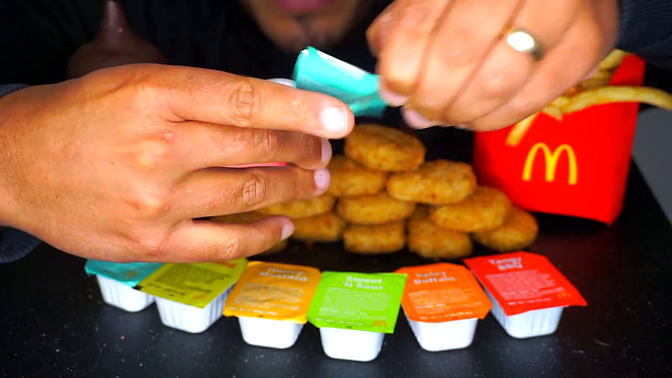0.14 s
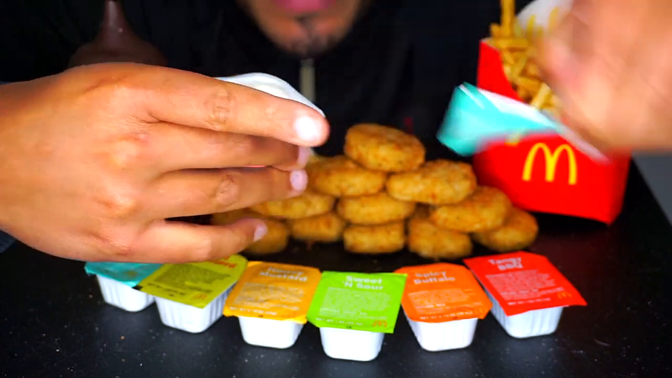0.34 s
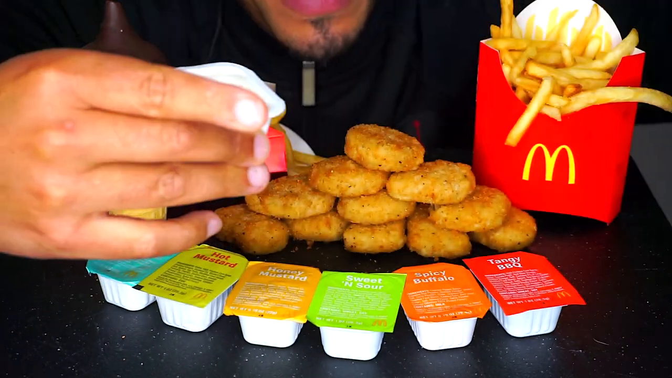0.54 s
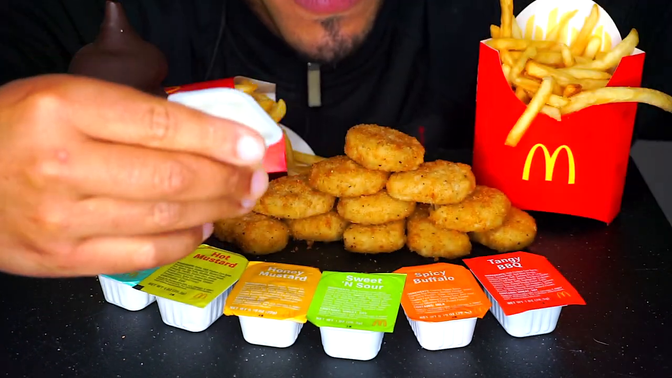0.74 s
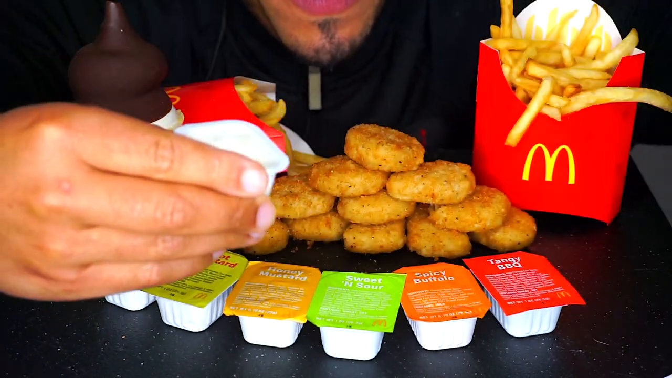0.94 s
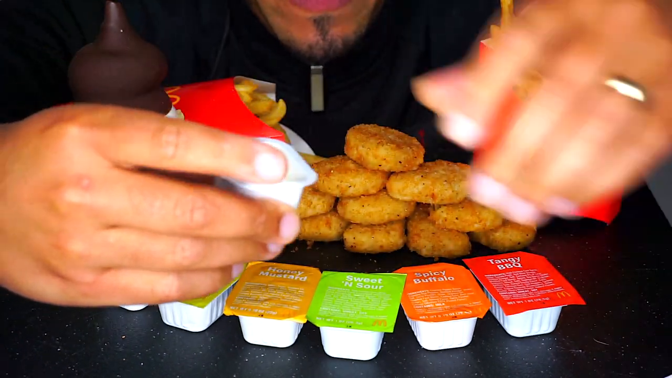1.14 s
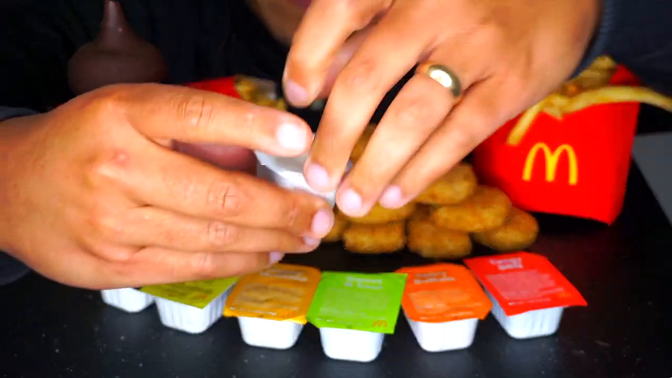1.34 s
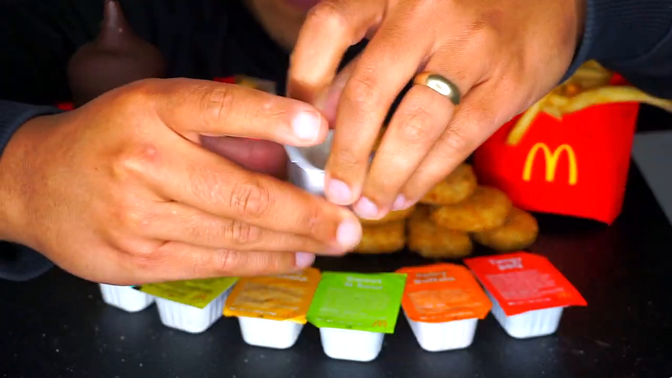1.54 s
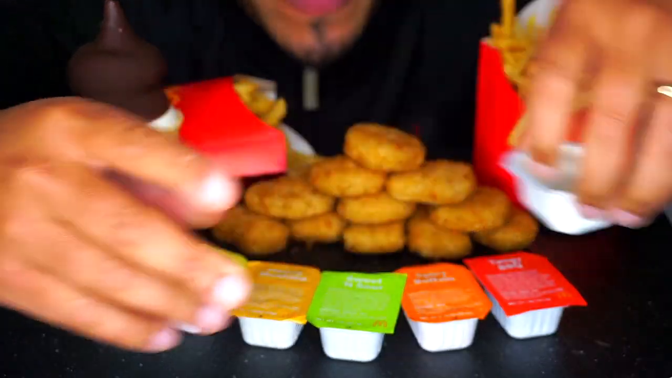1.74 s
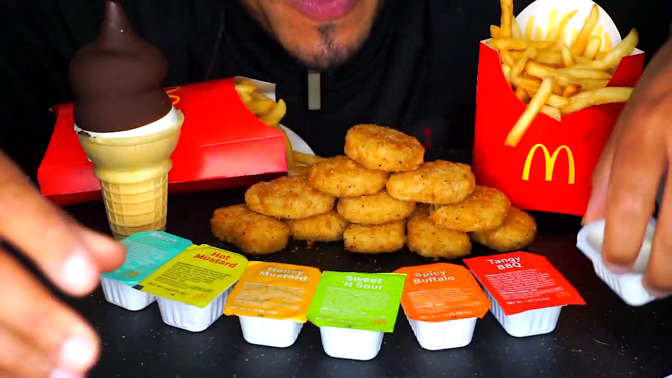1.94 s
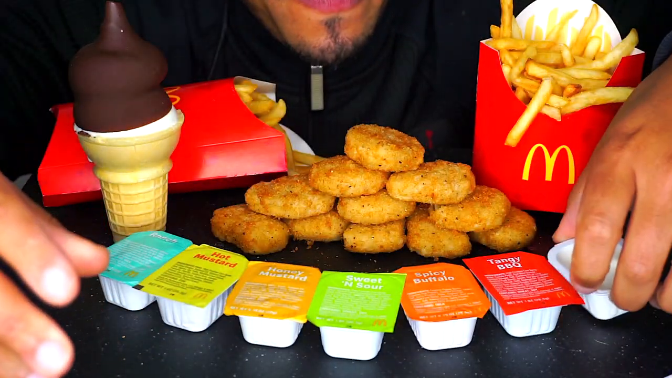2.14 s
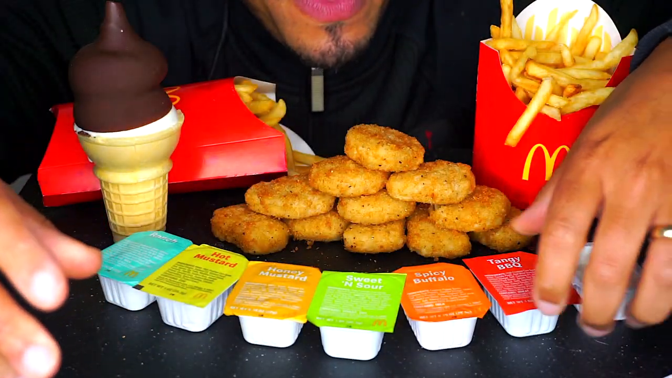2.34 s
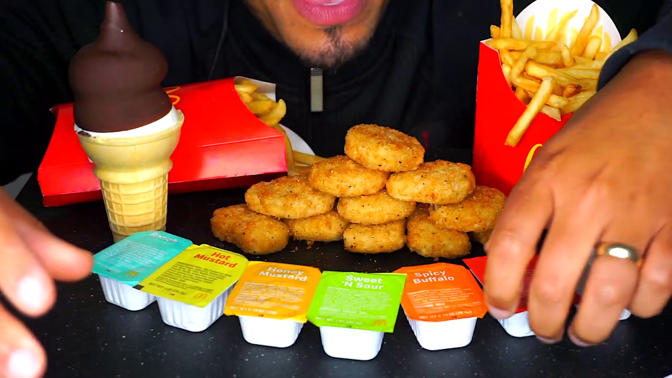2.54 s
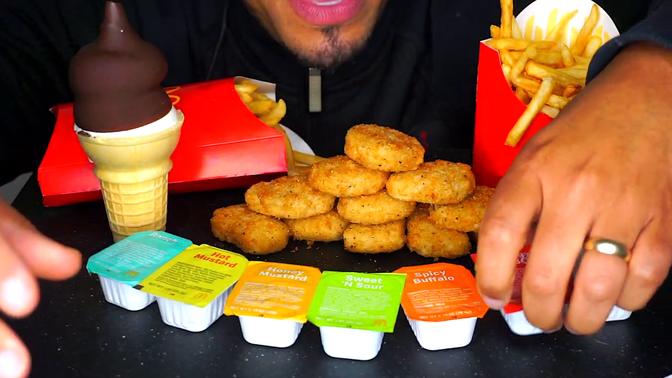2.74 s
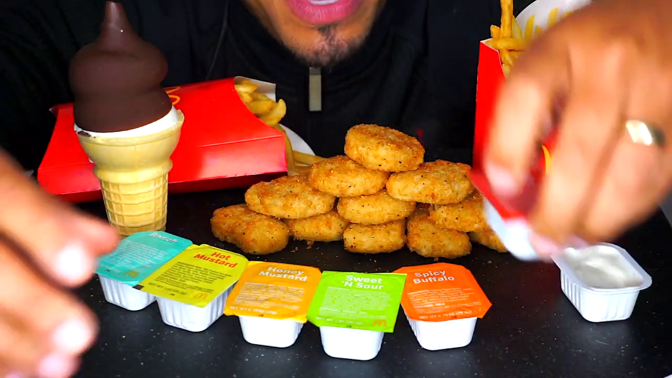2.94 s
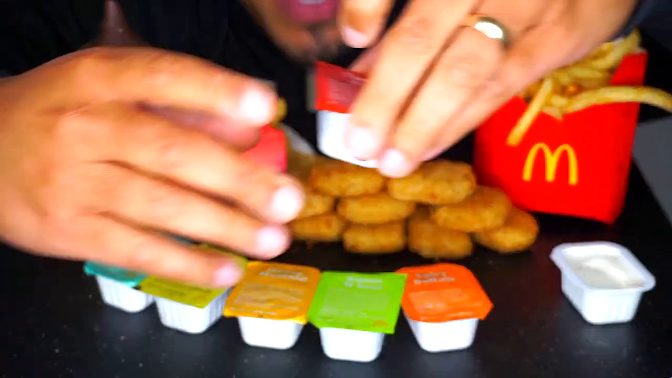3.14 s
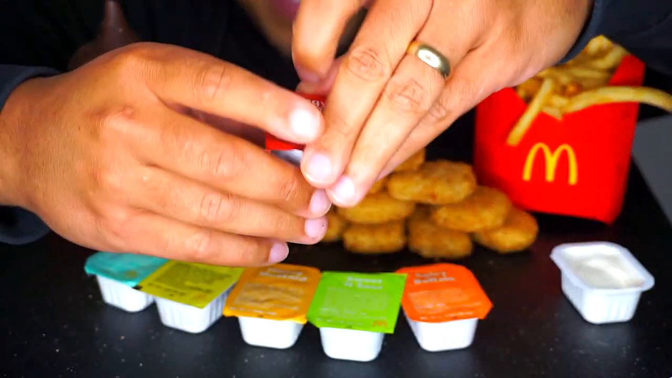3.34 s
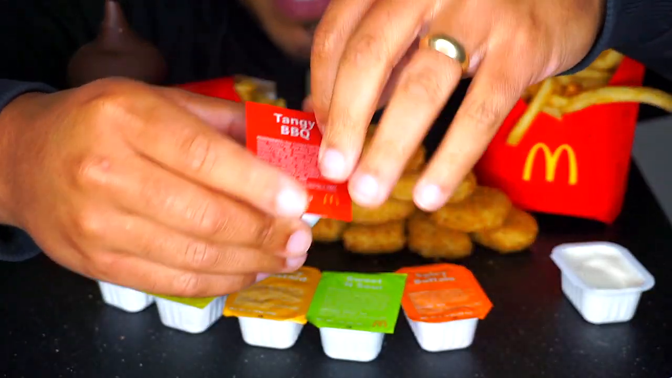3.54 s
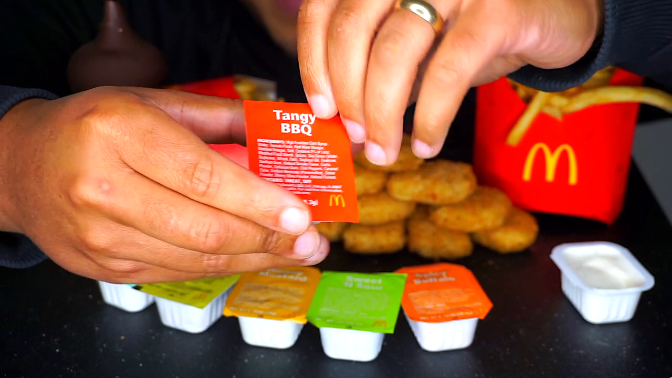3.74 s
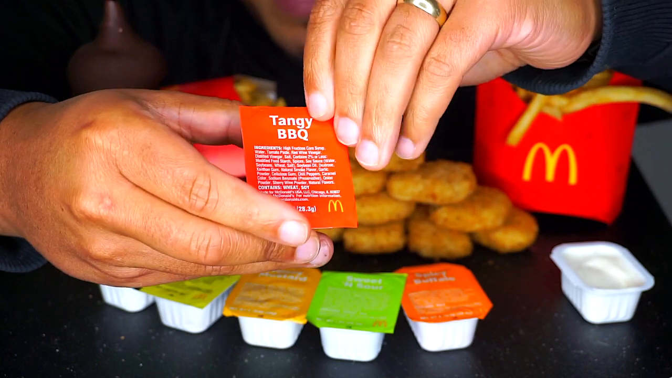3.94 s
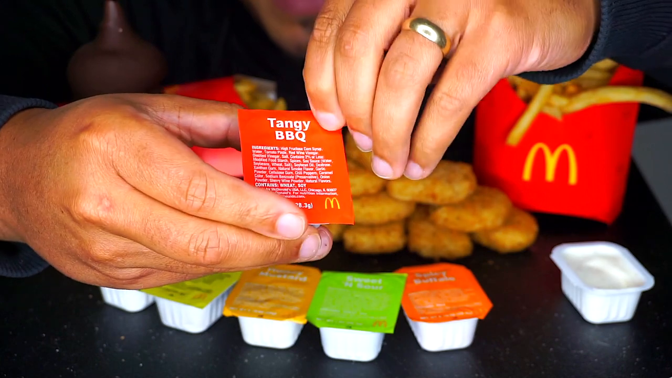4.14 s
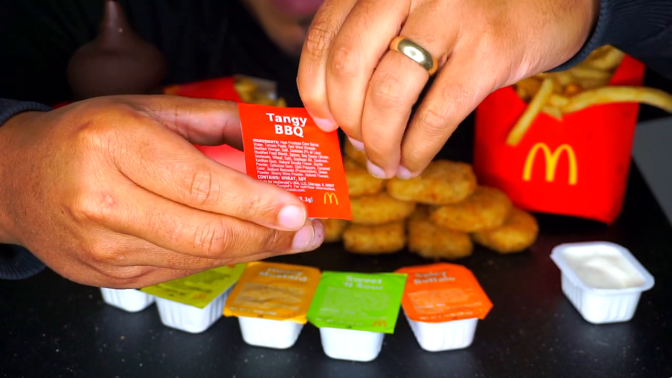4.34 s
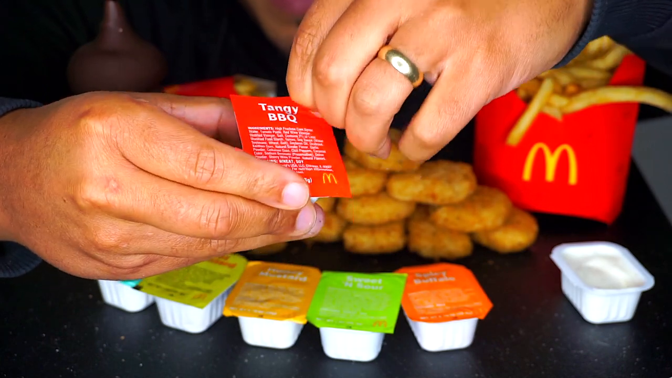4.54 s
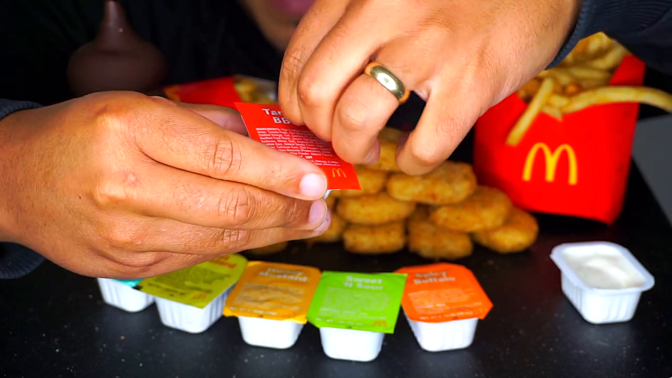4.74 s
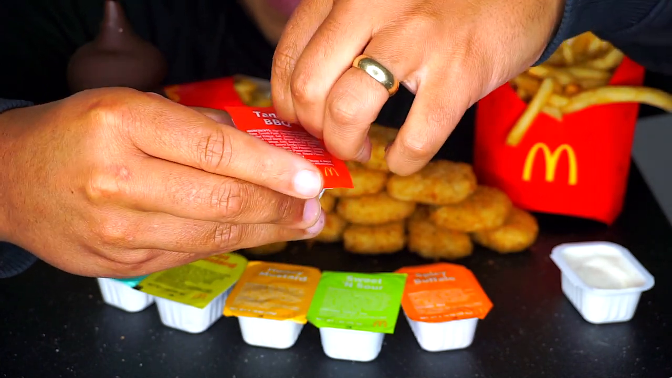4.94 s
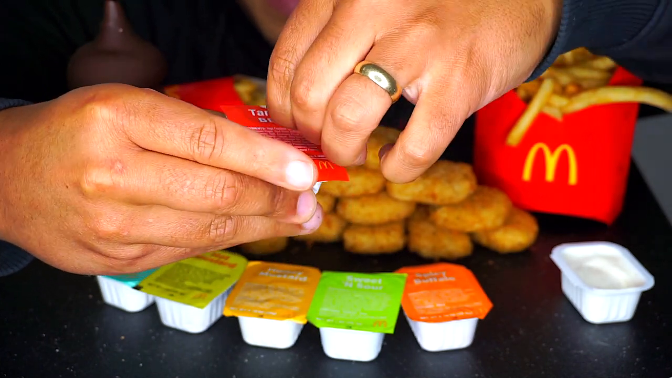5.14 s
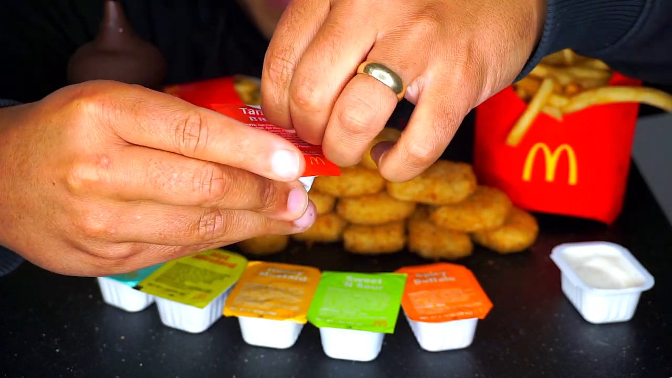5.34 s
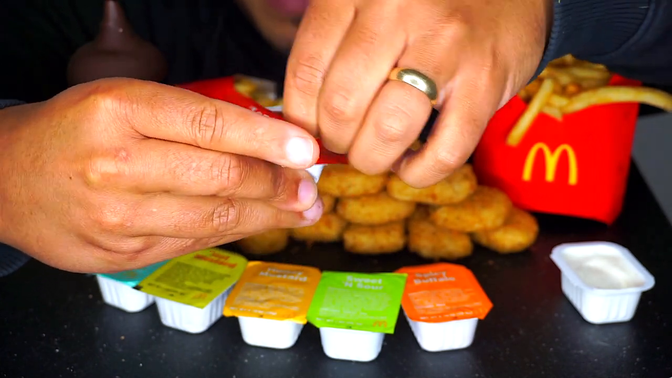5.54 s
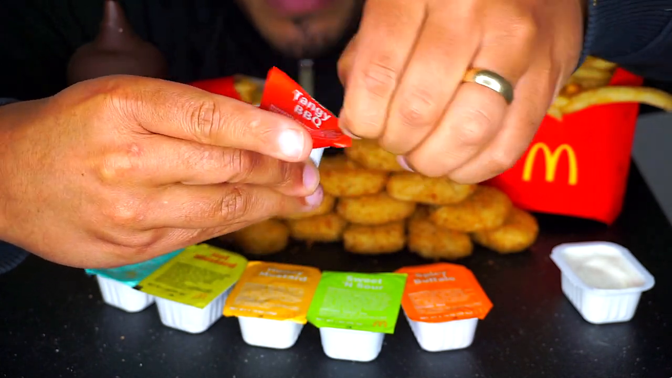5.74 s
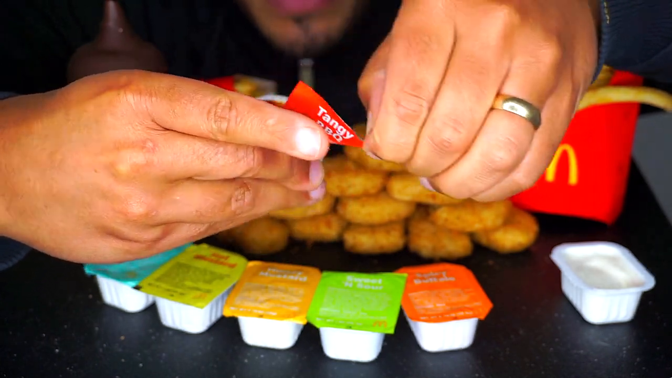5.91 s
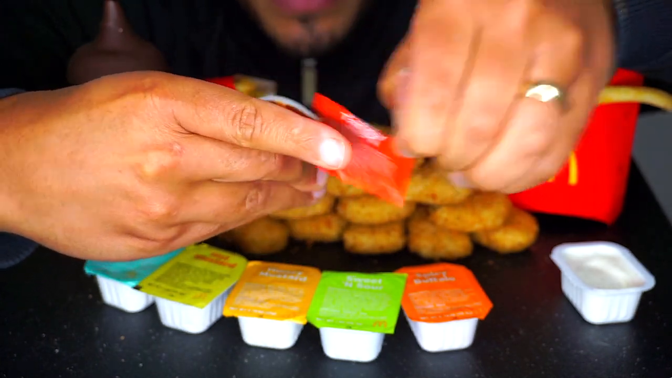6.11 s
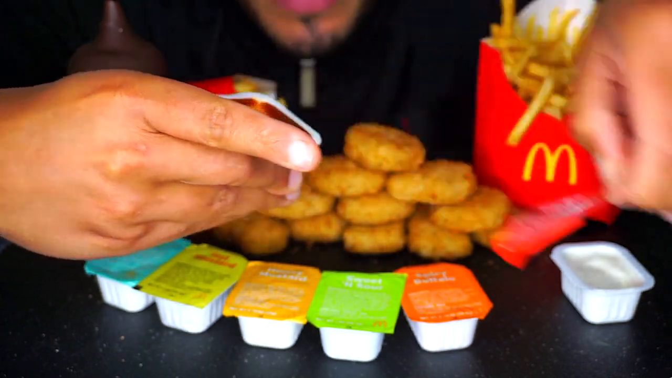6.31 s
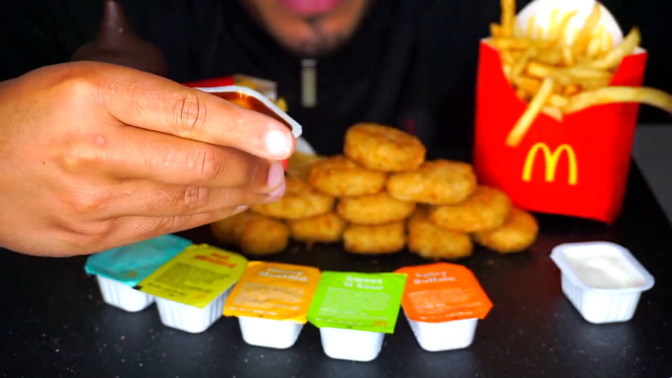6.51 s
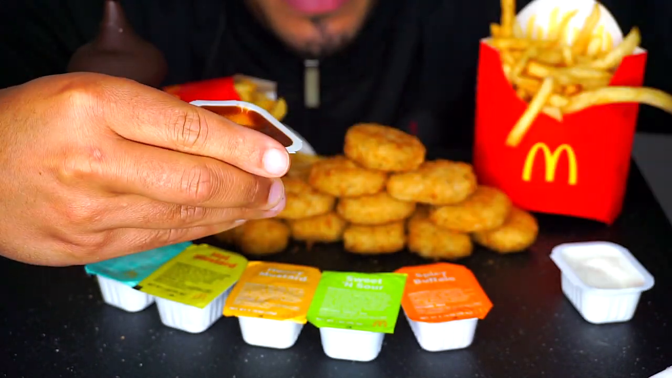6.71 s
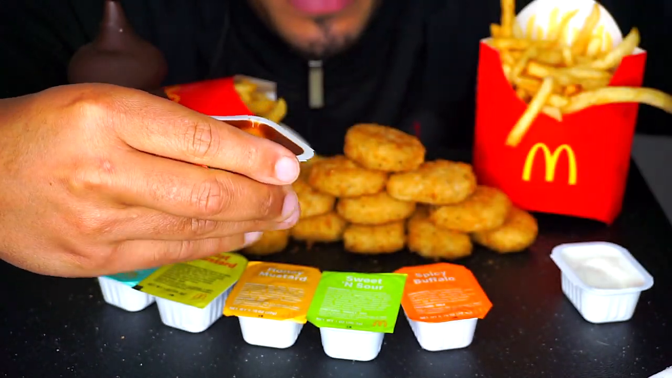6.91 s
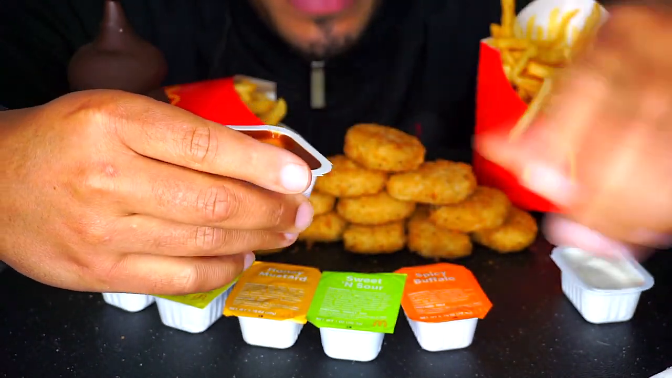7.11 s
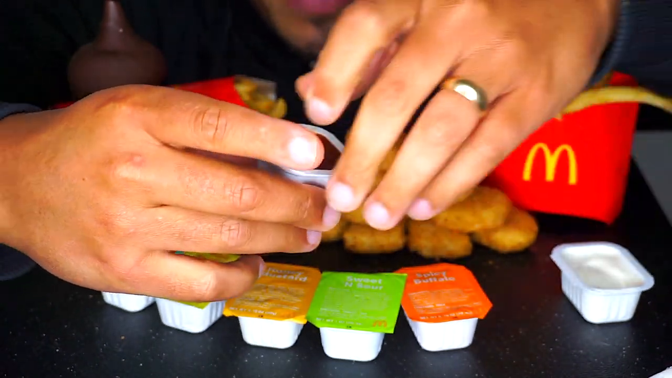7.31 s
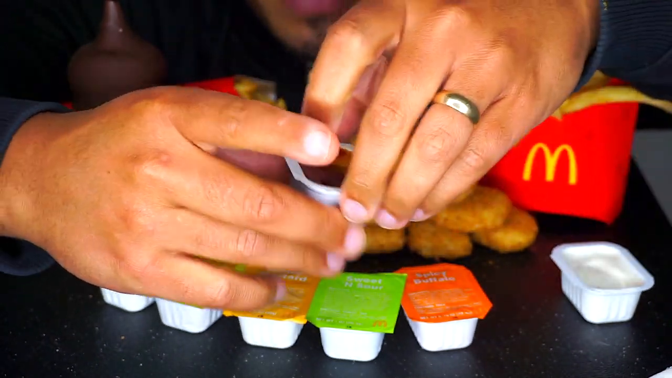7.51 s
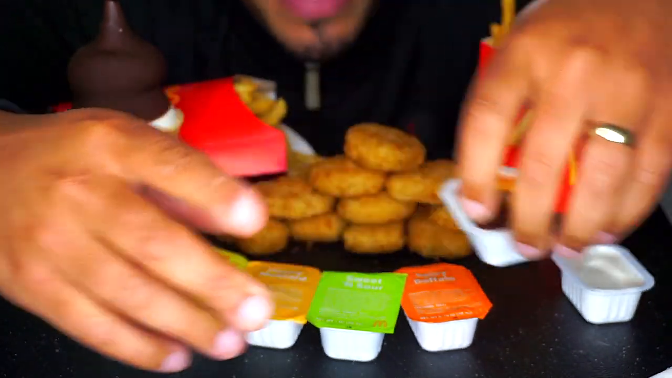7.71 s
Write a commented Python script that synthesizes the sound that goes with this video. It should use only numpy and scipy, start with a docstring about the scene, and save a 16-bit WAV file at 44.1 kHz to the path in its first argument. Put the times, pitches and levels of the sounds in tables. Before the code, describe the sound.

Close handling of plastic sauce cups: a brief tear, pops and soft rubbing, then a foil lid snaps and rips off loudly.

```python
"""Peeling foil lids off sauce cups

Plastic cups are opened close to a stereo microphone in a live room. The seal tears in stick-slip rips
that ring the cup; the lid snaps and swishes, the wall pops, fingers rub and skid, one cup is set down.
The loudest peaks clip the recorder. Under it all lie room noise and a faint electrical buzz."""
import sys
import numpy as np
from scipy import signal
from scipy.fft import rfft, irfft
from scipy.io import wavfile
from scipy.ndimage import map_coordinates

SR = 44100
rng = np.random.default_rng(int(sys.argv[2]) if len(sys.argv) > 2 else 0)


def log_audio(samples):
    """Write samples as a 16-bit WAV file to the path given in sys.argv[1]."""
    # one column per channel
    frames = np.atleast_2d(samples).T
    # limit to full scale, then quantise
    limited = np.clip(frames, -1, 1)
    pcm = np.round(limited * 32767).astype(np.int16)
    wavfile.write(sys.argv[1], SR, pcm)


N = 342657
TIME_S = np.arange(N) / SR
CUP_REST_HZ = 2263  # cup pitch with its modes unshifted

# Room noise spectrum. Each row: frequency in Hz, gain in dB.
AIR_SPECTRUM = [(15, -93.5), (25, -38), (161, -4), (291, -4.5), (403, -7), (437, -7.5), (654, -5),
                (1500, -7), (5090, -11.5), (15800, -10.5)]
# Background level. Each row: time in seconds, gain in dB.
BACKGROUND_GAIN = [(0, -41.5), (2, -48.5), (2.7, -45), (4.5, -44.5), (7, -48), (7.77, -53)]
# Hum and whine. Each row: frequency in Hz, width in Hz, level in dB.
HUM_BANDS = [(402.4, 36, -11.5), (644, 47, -11), (12930, 85, -11.5)]
# Reverberation. Each row: frequency in Hz, T60 in seconds, level in dB, side gain in dB.
ROOM_BANDS = [(500, 0.5, 1, -7.5), (2104, 0.57, -0.5, -7), (5100, 0.65, 4, 0.5), (10460, 0.46, -4, -5)]
# Microphone pair width. Each row: frequency in Hz, side gain in dB.
MIC_WIDTH = [(1500, -2), (2800, -2.5), (4300, 7), (8000, -0.5)]

# Cup modes: on the table, at the rim, in the hand. Each row: frequency in Hz, width in Hz, gain in dB.
TABLE_MODES = [(161, 62, 0.5), (291, 150, -1), (395, 40, 7), (470, 57, -3), (666, 64, 4.5),
               (910, 1000, -4.5)]
RIM_MODES = [(2070, 620, 11), (2340, 300, 15.5), (3530, 1030, -1)]
HELD_MODES = [(2106, 150, 15.5), (2490, 72, 2), (2460, 500, 5.5)]
# Held cup's pitch, which rises as the lid lifts. Each row: time in seconds, pitch in Hz.
CUP_PITCH = [(0, 2510), (0.8, 2300), (3.5, 2000), (4.75, 1575), (5.1, 1500), (5.25, 2160), (5.42, 2700),
             (5.52, 2224)]
# Spectra of foil sizzle, foil crack, friction and cup radiation. Each row: frequency in Hz, gain in dB.
SIZZLE_SPECTRUM = [(100, -33.5), (1200, -7), (3000, 3), (7000, -0.5), (10500, 4), (13000, 3), (16000, -7)]
CRACK_SPECTRUM = [(100, -33.5), (2000, -8), (5500, -13), (9000, -3), (13000, 2.5), (16000, -11)]
HISS_SPECTRUM = [(100, -34), (600, -19), (1500, -4.5), (3500, 1), (7000, 2), (10000, 7), (13500, 5.5),
                 (16000, -3.5)]
CUP_RADIATION = [(100, -15), (500, -3), (900, -4.5), (1400, -1), (3100, 2.5), (4300, -2.5), (14000, 0)]

# Cup meets table. Each row: start in seconds, rim level in dB, thud level in dB, thud centre in Hz.
BUMPS = [(2.240, -39, -43, 640), (2.259, -43, -39, 380), (2.279, -43.5, -44.5, 380)]
# Grip shifts. Each row: start and end in seconds, level in dB, nominal ticks per second.
FIDGETS = [(3.673, 4.641, -54.5, 220), (6.543, 6.725, -38, 540)]
# Fingers on the cup. Each row: start and end in seconds, hiss level in dB, ring level in dB.
RUBS = [(0.631, 0.798, -33.5, -46), (0.791, 0.883, -28.5, -32), (2.922, 3.115, -44, -51),
        (3.472, 3.543, -25, -33.5), (4.735, 4.895, -26, -24), (5.061, 5.15, -18, -22),
        (5.177, 5.301, -21, -34.5), (5.241, 5.379, -25.5, -17)]
# Squeaky skids. Each row: start and end in seconds, hiss and squeak levels in dB, pitch in Hz,
# squeak width as a share of pitch.
SKIDS = [(0.854, 0.995, -26, -24.5, 5000, 0.73), (2.309, 2.392, -50, -36, 2280, 0.043),
         (2.618, 2.69, -50, -47.5, 3400, 0.57), (3.859, 4.052, -32.5, -42.5, 6230, 0.073),
         (5.026, 5.083, -31.5, -30, 10600, 0.23), (5.053, 5.083, -28.5, -14.5, 10200, 0.21),
         (6.66, 6.82, -35, -36.5, 4310, 0.87)]
# Loose lid moves. Each row: peak time in seconds, hiss level in dB, flap level in dB.
SWISHES = [(0.192, -19.5, -59), (0.613, -29, -44.5), (6.122, -22, -45), (6.15, -16, -30)]
# Wall buckles. Each row: start in seconds, pitch in Hz, level in dB, T60 in seconds,
# left minus right in dB.
POPS = [(0.782, 1620, -8, 0.0097, -2), (1.817, 873, -35, 0.043, -2), (3.478, 2010, -22.5, 0.066, -5),
        (5.073, 1530, -13.5, 0.053, -1), (5.202, 1976, -8, 0.046, -5), (5.247, 2300, 0.5, 0.013, -23),
        (5.497, 2160, -4, 0.03, 3)]
# Lid and rim snaps. Each row: start in seconds, cup level in dB, crack level in dB, cup pitch in Hz.
SNAPS = [(0.1176, -29, -17.5, 3400), (0.132, -42, -24, 3000), (0.157, -46, -20, 2500),
         (0.603, -39, -33, 2400), (0.783, -14, -29, 2170), (0.8633, -20, -42, 5250),
         (1.818, -47, -60, 2100), (3.5313, -34, -20, 2190), (3.87, -44, -35, 2800),
         (5.0596, -29, -13, 1590), (5.0726, -10, -10.5, 1990), (5.094, -7, -10.5, 1780),
         (5.496, -13, -19, 3020), (5.517, -9, -14, 2600), (5.549, -30, -20, 2500),
         (5.572, -17.5, -20, 2220), (5.58, -27, -15, 2220), (5.5991, -15, -6, 2300), (5.648, -3, -10, 2130),
         (5.8427, -17.5, -12, 2030), (5.961, -23, -17, 2340), (6.0829, -25.5, -20.5, 2140),
         (6.4417, -34.5, -34.5, 2330), (6.538, -26.5, -43, 3100), (6.6602, -31.5, -42, 1670),
         (6.7022, -28.5, -38, 3140)]
# Seal tears. Each row: start and end in seconds, foil and cup levels in dB, foil treble gain in dB.
RIPS = [(0, 0.117, -29.5, -27.5, -2), (5.412, 5.516, -9, -14, 2.5), (5.52, 5.597, -19.5, -48, -10),
        (5.596, 5.762, -9.5, -12, 4), (5.758, 5.816, -28, -36, 8), (5.93, 5.997, -23.5, -30, 4)]


def amp(db):
    return 10 ** (np.asarray(db) / 20)


def unit(x):
    """Scale to rms 1."""
    return x / np.sqrt(np.mean(x ** 2) + 1e-18)


def add(out, start_s, x):
    i = max(int(start_s * SR), 0)
    out[:, i:i + x.shape[-1]] += x[..., :N - i]


def panned(x, pan_db):
    """Pan by left minus right level."""
    return x * amp(np.array([[pan_db], [-pan_db]]) / 2)


def noise(n, side_db):
    """Mid/side stereo noise."""
    mid, side = rng.standard_normal((2, n))
    return unit(mid + amp(side_db) * np.array([side, -side]))


def wander(t, hz):
    """Random values, hz per second, joined by lines."""
    return np.interp(t * hz, np.arange(len(t)), rng.standard_normal(len(t)))


def decay(t, t60_s):
    return np.exp(-np.log(1000) * t / t60_s)


def colour(x, spectrum, size=2048):
    """Minimum-phase filter through (Hz, dB) points."""
    hz, db = np.transpose(spectrum)
    log_hz = np.log(np.fft.rfftfreq(size, 1 / SR) + 1)
    cepstrum = irfft(np.log(amp(np.interp(log_hz, np.log(hz), db))))
    cepstrum[1:size // 2] *= 2
    cepstrum[size // 2 + 1:] = 0
    impulse = irfft(np.exp(rfft(cepstrum)))
    return signal.fftconvolve(x, impulse[None], axes=1)[:, :x.shape[1]]


def ring(x, hz, width_hz):
    """One resonance, unity gain at centre."""
    return signal.lfilter(*signal.iirpeak(hz, hz / width_hz, fs=SR), x)


def cluster(x, hz, width_hz):
    """Close modes as one steep band."""
    return ring(ring(x, hz, width_hz), hz, width_hz)


def modes(x, table, tuning=1):
    """Parallel resonances of alternating sign."""
    return sum((-1) ** k * amp(db) * ring(x, hz * tuning, width_hz)
               for k, (hz, width_hz, db) in enumerate(table))


def cup_hz(time_s):
    return np.interp(time_s, *np.transpose(CUP_PITCH))


def slips(n, rate_hz, scatter_db, slip_s, side_db):
    """Stick-slip friction: uneven releases, each a tiny noise burst."""
    gap, size = rng.standard_normal((n, 2)).T
    onsets = np.cumsum(np.exp(.6 * gap)) * SR / rate_hz
    inside = onsets < n
    energy = amp(scatter_db * np.clip(size[inside], -2, 2)) ** 2
    kicks = np.bincount(onsets[inside].astype(int), energy, n)
    power = signal.lfilter([1], [1, -np.exp(-2 / (slip_s * SR))], kicks)
    return unit(np.sqrt(power) * noise(n, side_db))


def buzz(hz, phase_cycles, burst_s, side_db, spectrum):
    """Electrical interference: evenly repeating noise bursts."""
    offset_s = ((TIME_S * hz - phase_cycles + .5) % 1 - .5) / hz
    gate = np.exp(-(offset_s / burst_s) ** 2)
    return unit(colour(noise(N, side_db) * gate, spectrum))


def background(buzz_hz=59.94):
    """Room noise, hum and a treble fizz; lower ticks and flutter at half the fizz rate."""
    air = unit(colour(noise(N, 0), AIR_SPECTRUM))
    air = colour(air, [(9000, 1.8), (13000, 1.6), (16000, 8.7)])
    hum = sum(amp(db) * unit(ring(noise(N, -0.98), hz, width_hz)) for hz, width_hz, db in HUM_BANDS)
    fizz = buzz(buzz_hz, 0.62, 0.00097, -0.5, [(9000, -39.5), (12000, -1), (14200, 13), (16000, -22.5)])
    tick = buzz(buzz_hz / 2, 0.567, 0.0011, -1, [(500, -20), (2000, -4), (10000, -4)])
    flutter = buzz(buzz_hz / 2, 0.929, 0.0013, -24,
                   [(60, -22), (200, 1.5), (750, 0.5), (1600, -12.5), (5000, -32.5)])
    total = air + hum + amp(-7) * fizz + amp(-17) * tick + amp(-11) * flutter
    return total * amp(np.interp(TIME_S, *np.transpose(BACKGROUND_GAIN)))


def room(x, wet_db=-4, late_db=-26, late_t60_s=1.74, build_s=0.00073, early_db=-2, early_s=0.0045):
    """Early table reflections, then dense ones decaying by band over a faint longer tail."""
    t = np.arange(int(1.5 * SR)) / SR
    log_hz = np.log(np.fft.rfftfreq(len(t), 1 / SR) + 1)
    log_centres = np.log(np.array(ROOM_BANDS)[:, 0])
    tail = 0
    for (_, t60_s, db, side_db), selector in zip(ROOM_BANDS, np.eye(len(ROOM_BANDS))):
        share = np.interp(log_hz, log_centres, selector)
        band = irfft(rfft(noise(len(t), side_db)) * np.sqrt(share), len(t))
        tail = tail + amp(db) * band * (decay(t, t60_s) + amp(late_db) * decay(t, late_t60_s))
    build = 1 - np.exp(-t / build_s)
    early_boost = 1 + amp(early_db) * np.exp(-t / early_s)
    impulse = unit(tail * build * early_boost) / np.sqrt(len(t))
    return amp(wet_db) * signal.fftconvolve(x.mean(axis=0)[None], impulse, axes=1)[:, :N]


def microphones(x):
    """Stereo pair: hands slightly right, widest in the low treble."""
    mid = x.mean(axis=0)
    side = colour((x[:1] - x[1:]) / 2, MIC_WIDTH)[0]
    return panned(np.array([mid + side, mid - side]), pan_db=-1)


def set_down(contact_s=0.018, thud_s=0.01):
    """A full cup clacks on one edge and rocks flat, thudding lower as contact grows."""
    out, t = np.zeros((2, N)), np.arange(SR // 4) / SR
    thud_band = signal.butter(2, [100, 950], "bandpass", fs=SR, output="sos")
    for start_s, rim_db, thud_db, thud_hz in BUMPS:
        rim = modes(np.exp(-t / contact_s) * noise(len(t), -5), RIM_MODES)
        rim = colour(rim, CUP_RADIATION)
        rim = colour(rim, [(3800, 3), (5000, 1.5)])  # sauce damps the treble
        thud = modes(np.exp(-t / thud_s) * noise(len(t), -19), TABLE_MODES)
        thud = signal.sosfilt(thud_band, ring(thud, thud_hz, thud_hz))
        add(out, start_s, amp(rim_db) * unit(rim) + amp(thud_db) * unit(thud))
    return out


def fidgets(foil_db=-19, width_hz=2600):
    """Stray ticks of nails and foil: part cup ring, part crackle."""
    out = np.zeros((2, N))
    for start_s, end_s, db, rate_hz in FIDGETS:
        ticks = slips(int((end_s - start_s) * SR), rate_hz, scatter_db=9.5, slip_s=0.00214, side_db=-3)
        cup = cluster(ticks, CUP_REST_HZ, width_hz)
        add(out, start_s, amp(db) * unit(colour(cup + amp(foil_db) * ticks, HISS_SPECTRUM)))
    return out


def slide(rise_s, length_s, hiss_db, tilt_db_per_octave, rings, width_ratio=0.37):
    """Friction grains swell and fade, hissing and exciting the (Hz, dB) rings."""
    t = np.arange(int(max(length_s, .01) * SR)) / SR
    *ring_grains, hiss_grains = [slips(len(t), rate_hz=2000, scatter_db=-1, slip_s=0.00034, side_db=-2)
                                 for _ in range(len(rings) + 1)]
    spectrum = [(hz, db + tilt_db_per_octave * np.log2(max(hz, 4000))) for hz, db in HISS_SPECTRUM]
    hiss = unit(colour(hiss_grains, spectrum))
    body = sum(amp(db) * unit(cluster(grains, hz, hz * width_ratio))
               for grains, (hz, db) in zip(ring_grains, rings))
    speed = np.interp(t, [0, rise_s, length_s], [0, 1, 0])
    return speed * (amp(hiss_db) * hiss + body)


def rubs(rise_s=0.0167, tilt_db_per_octave=-2.5, rim_hz=2550, edge_hz=3700):
    """A finger catches and slides to rest, ringing the cup's body, rim and edge."""
    out = np.zeros((2, N))
    for start_s, end_s, hiss_db, ring_db in RUBS:
        rings = [(cup_hz(start_s + rise_s), ring_db), (rim_hz, ring_db - 7), (edge_hz, ring_db - 12)]
        add(out, start_s, slide(rise_s, end_s - start_s, hiss_db, tilt_db_per_octave, rings))
    return out


def skids(rise_share=0.062, sag_share=0.071, neutral_hz=5970):
    """Fingertip on foil, or cup on table: hiss, and a squeak that sags as the skid slows."""
    out = np.zeros((2, N))
    for start_s, end_s, hiss_db, squeak_db, hz, width_ratio in SKIDS:
        length_s = max(end_s - start_s, .01)
        tilt_db_per_octave = 4 * np.log2(hz / neutral_hz)  # higher squeak, brighter hiss
        hiss = slide(rise_share * length_s, length_s, hiss_db, tilt_db_per_octave, rings=[])
        progress = np.linspace(0, 1, hiss.shape[1])
        steady = unit(cluster(rng.standard_normal(len(progress)), hz, hz * width_ratio))
        squeak = map_coordinates(steady, [np.cumsum(1 - sag_share * progress)], mode="mirror")
        envelope = np.interp(progress, [0, rise_share, 1], [0, 1, 0]) ** 2
        add(out, start_s, hiss + amp(squeak_db) * squeak * envelope)
    return out


def swishes(rise_s=0.028, fall_s=0.11, tilt_db_per_octave=-1.5, flap_hz=900):
    """The loose foil lid swishes and flaps as it comes free or is laid aside; the cup rings."""
    out = np.zeros((2, N))
    for peak_s, hiss_db, flap_db in SWISHES:
        rings = [(flap_hz, flap_db), (cup_hz(peak_s), flap_db + 10.5)]
        swish = slide(rise_s, rise_s + fall_s, hiss_db, tilt_db_per_octave, rings, width_ratio=0.77)
        add(out, peak_s - rise_s, swish)
    return out


def pops(push_s=0.00042):
    """The thin cup wall springs through and rings at one pitch."""
    out, t = np.zeros((2, N)), np.arange(SR // 8) / SR
    for start_s, hz, db, t60_s, pan_db in POPS:
        envelope = (1 - np.exp(-t / push_s)) * decay(t, t60_s)
        add(out, start_s, panned(amp(db) * envelope * np.sin(2 * np.pi * hz * t), pan_db))
    return out


def snaps(burst_s=0.00072, settle_db=-31, settle_s=0.028, size=2048):
    """A crease flips: the foil cracks, the cup rings, both settle in a soft crinkle."""
    out, t = np.zeros((2, N)), np.arange(size) / SR
    envelope = t / burst_s * np.exp(-1.5 * t / burst_s) + amp(settle_db) * np.exp(-t / settle_s)
    onset_gain = np.sqrt(0.0044 * SR / size)  # levels refer to the first few ms
    for start_s, cup_db, crack_db, hz in SNAPS:
        cup = unit(colour(cluster(envelope * noise(size, -11), hz, width_hz=hz), CUP_RADIATION))
        crack = unit(colour(envelope * noise(size, -10), CRACK_SPECTRUM))
        add(out, start_s, onset_gain * (amp(cup_db) * cup + amp(crack_db) * crack))
    return out


def foil_sizzle(tear, t, treble_db, swell_s=0.0052, width_hz=3500, wander_db=3, wander_hz=25):
    """Lifted foil sizzles; its resonances swell and shrink as the flap changes shape."""
    spectrum = [(hz, db + treble_db * (hz > 8000)) for hz, db in SIZZLE_SPECTRUM]
    sizzle = colour(tear * (1 - np.exp(-t / swell_s)), spectrum)
    flexing = sum(ring(sizzle, hz, width_hz) * (amp(wander_db * wander(t, wander_hz)) - 1)
                  for hz in (5780, 10050, 13800))
    return unit(sizzle + flexing)


def rips(edge_s=0.0015, jerk_db=0.7, jerk_hz=170, wall_db=-3, fade_db_per_s=43.5):
    """Glue lets go in dense slips that drive foil and cup; the cup crossfades from start to end pitch."""
    out = np.zeros((2, N))
    for start_s, end_s, foil_db, cup_db, treble_db in RIPS:
        length_s = max(end_s - start_s, .01)
        t = np.arange(int((length_s + 0.051) * SR)) / SR
        rate_hz = 1700 * (length_s / 0.12) ** 1.5  # long tears run smoothly, short ones stutter
        pull = np.clip(np.minimum(t, length_s + edge_s - t) / edge_s, 0, 1)
        tear = slips(len(t), rate_hz, scatter_db=1.5, slip_s=0.00084, side_db=-6.5)
        tear = tear * pull * amp(jerk_db * wander(t, jerk_hz))
        early, late = (modes(tear, HELD_MODES, cup_hz(s) / CUP_REST_HZ) for s in (start_s, end_s))
        opened = np.minimum(t / length_s, 1)
        body = unit((1 - opened) * early + opened * late)
        walls = amp(wall_db) * unit(cluster(tear, cup_hz(start_s), width_hz=3000))
        cup = unit(colour(body + walls, CUP_RADIATION))
        # The tear runs away from the cup's corner and drives it less.
        drive = amp(cup_db - fade_db_per_s * t + jerk_db * wander(t, jerk_hz))
        foil = amp(foil_db) * foil_sizzle(tear, t, treble_db)
        add(out, start_s, np.sqrt(pull.mean()) * (foil + drive * cup))
    return out


def scene(table_send_db=1):
    """Direct sound, separate reflections for each group, and background."""
    hands = [snaps() + pops(), rips(), rubs() + fidgets(), skids() + swishes()]
    table = set_down()
    reflections = sum(room(group) for group in hands) + amp(table_send_db) * room(table)
    return microphones(sum(hands) + table) + reflections + panned(background(), pan_db=-0.5)


def record(dry):
    """The recorder clips at full scale, then low-passes."""
    lowpass = signal.ellip(10, .1, 70, 15900, fs=SR, output="sos")
    return signal.sosfilt(lowpass, np.clip(dry, -1, 1))


dry = scene()
out = record(dry)
log_audio(out)
```